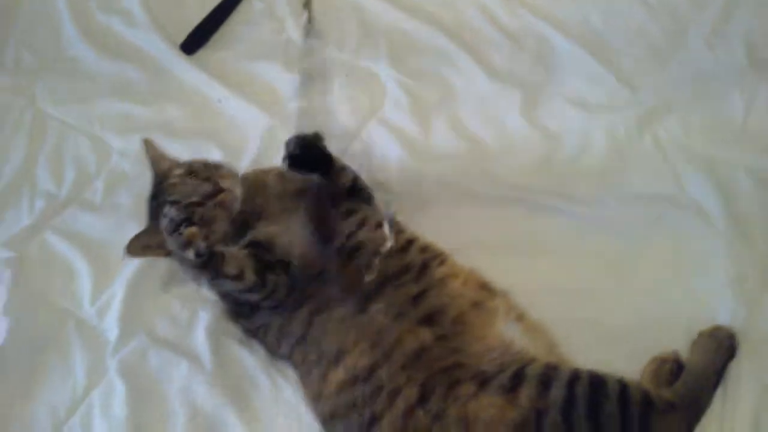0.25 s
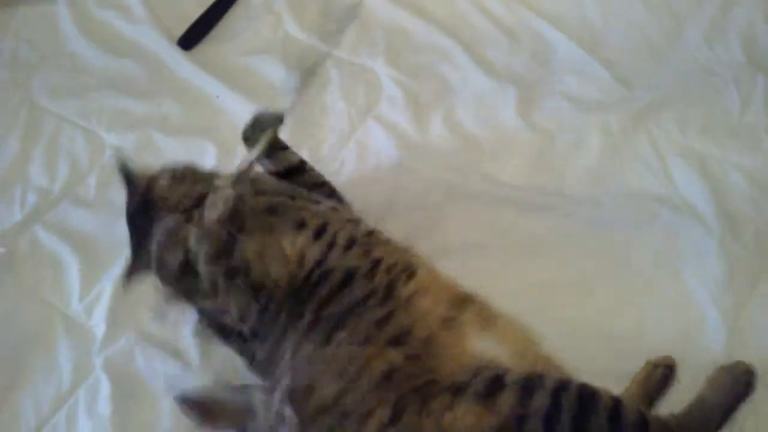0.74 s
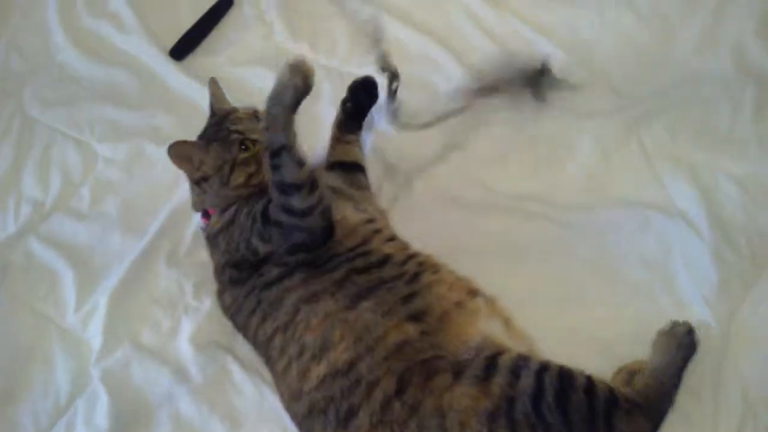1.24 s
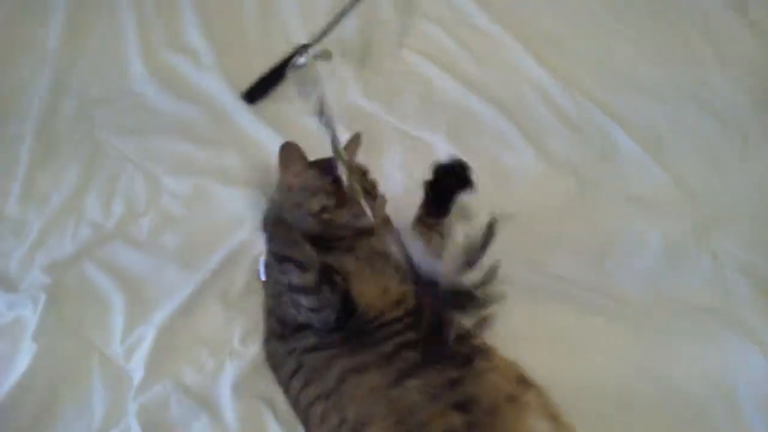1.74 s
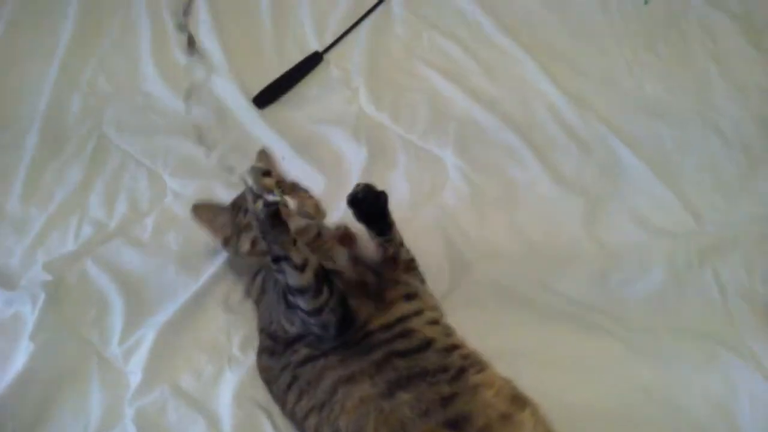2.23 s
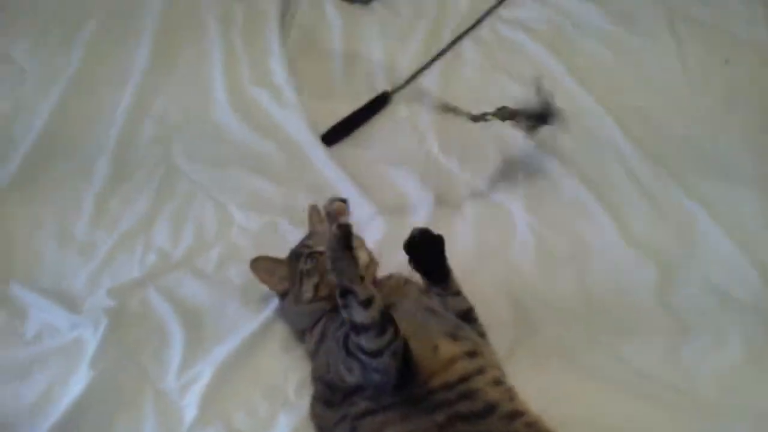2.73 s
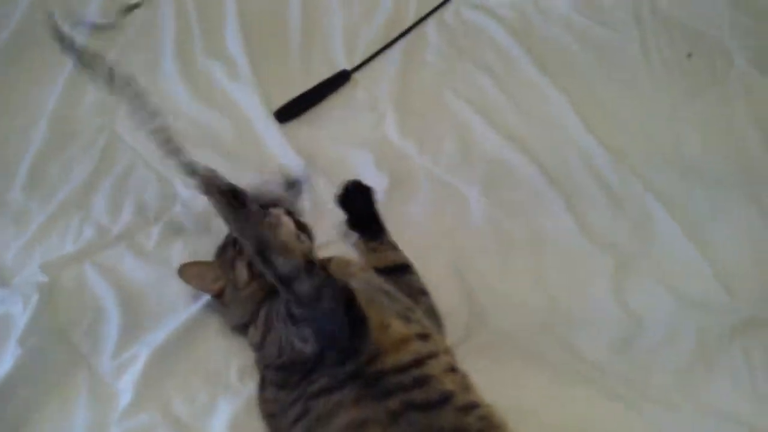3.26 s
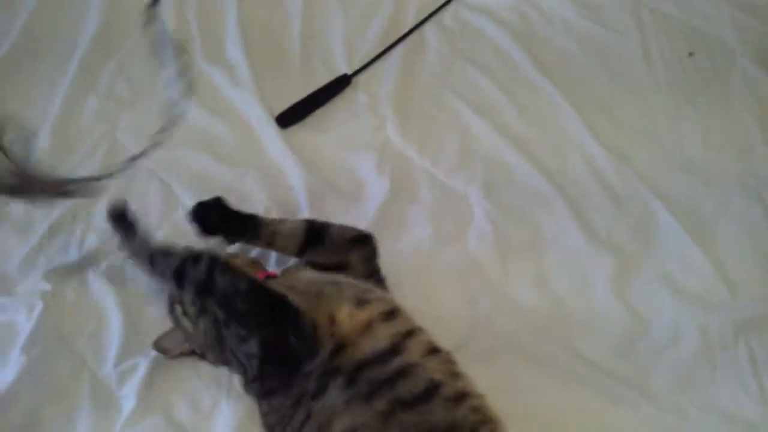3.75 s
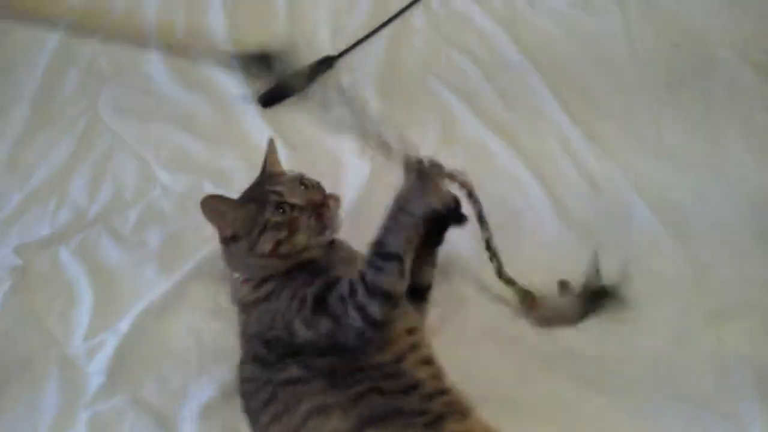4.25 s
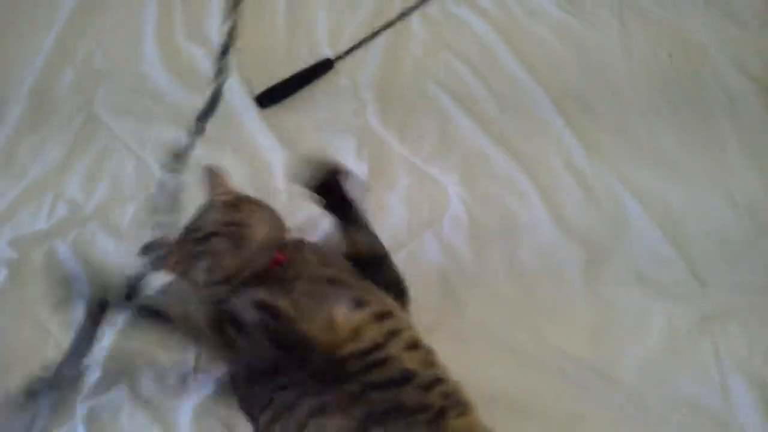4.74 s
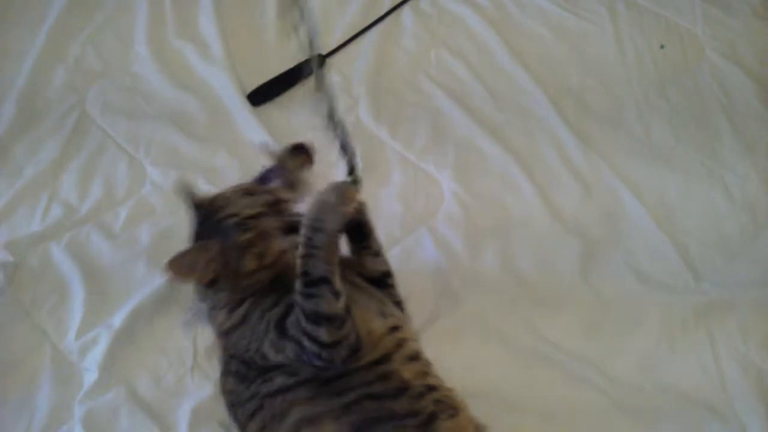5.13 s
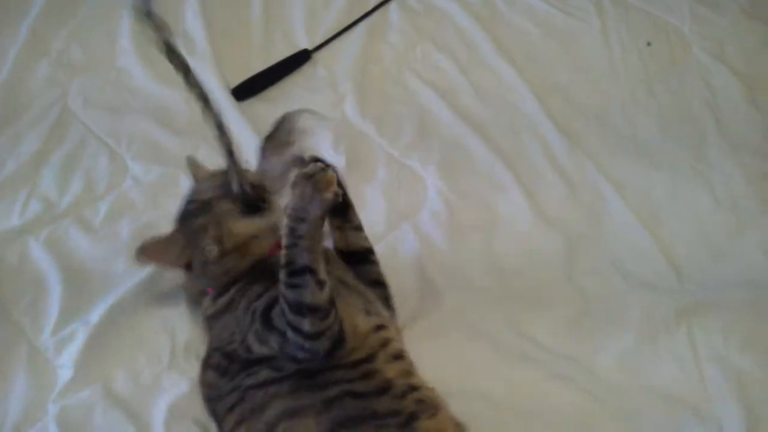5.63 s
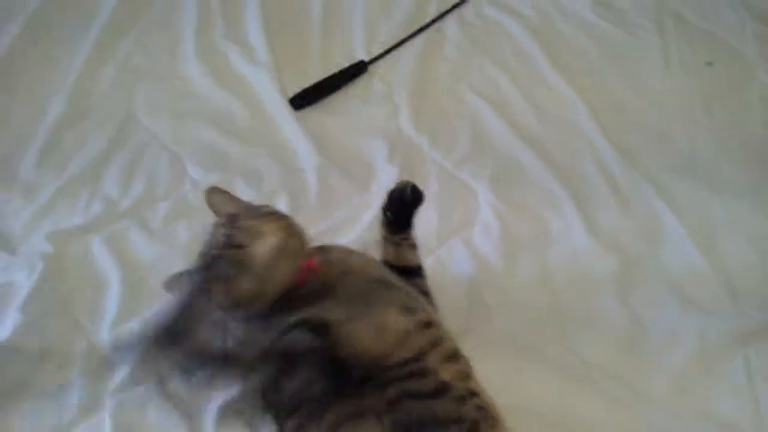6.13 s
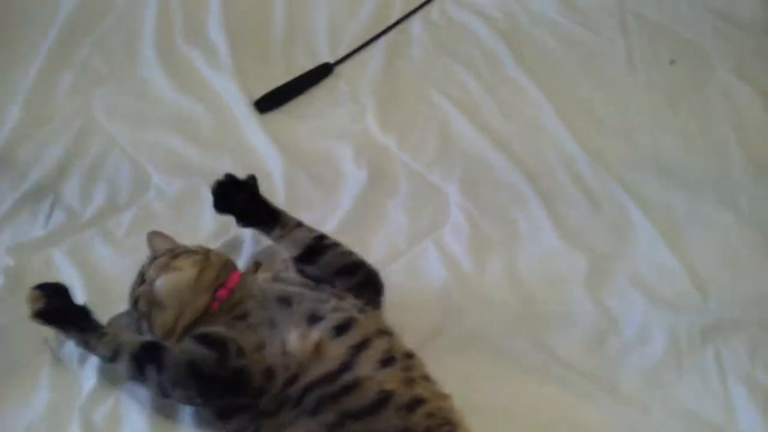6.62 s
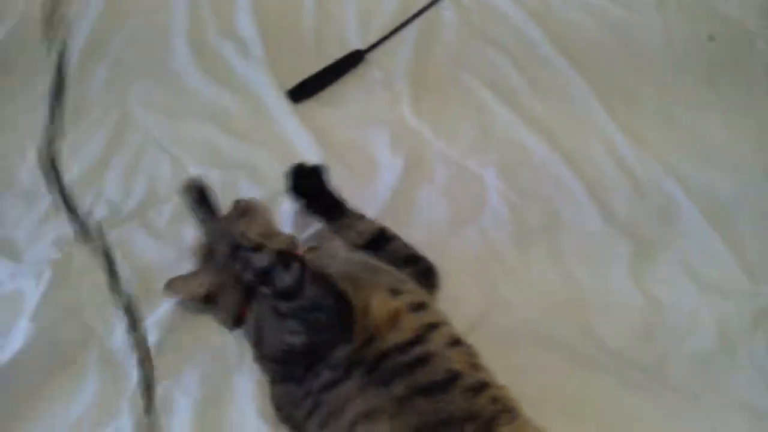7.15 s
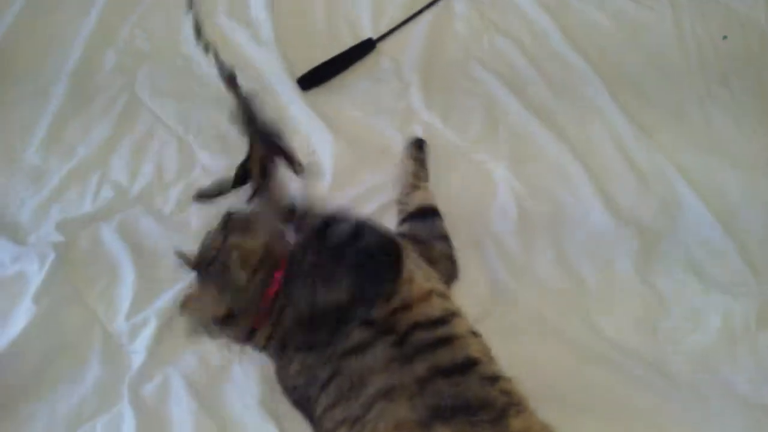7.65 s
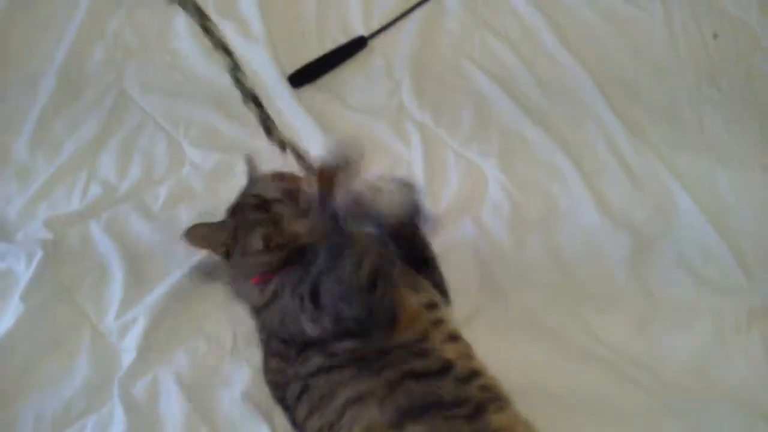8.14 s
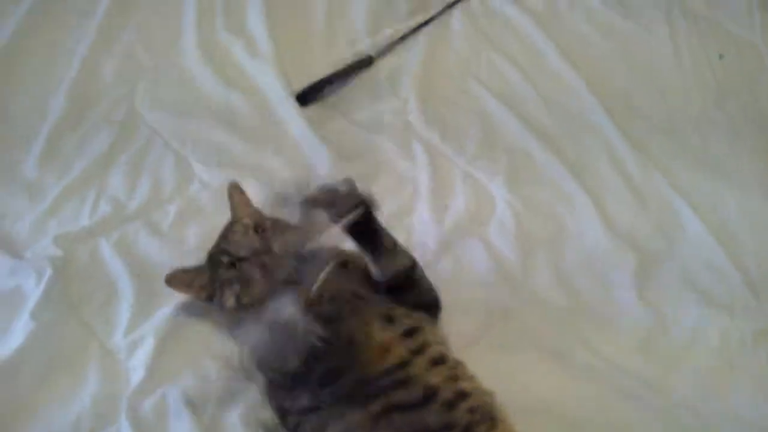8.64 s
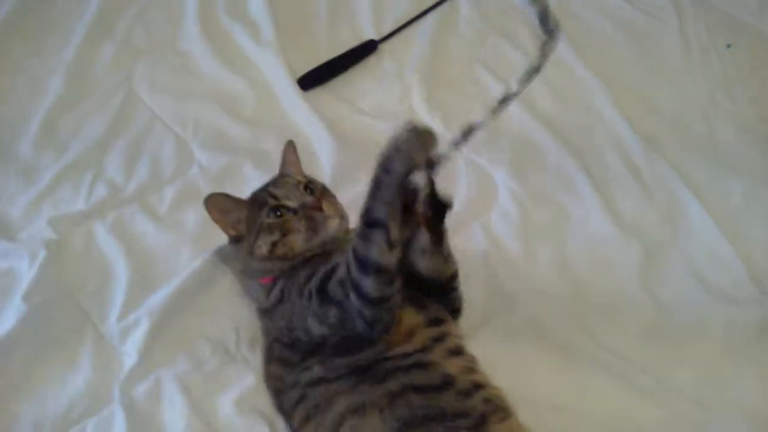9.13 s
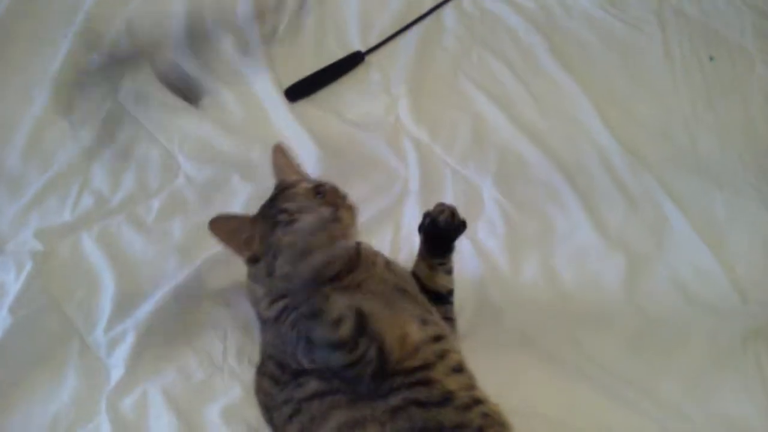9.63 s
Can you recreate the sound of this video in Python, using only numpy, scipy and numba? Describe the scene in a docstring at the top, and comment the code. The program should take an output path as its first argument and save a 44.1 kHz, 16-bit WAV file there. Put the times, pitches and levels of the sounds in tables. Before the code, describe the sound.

A small bell on a cat's collar jingles close to the microphone from the start, as the cat rolls on a bed and swats at a feather toy. The sound is high, thin and metallic: several irregular strikes a second, each followed by a short rattle. Light clicks from the toy mix in throughout. The jingling dips briefly near 3 and 4.3 seconds, nearly stops from 5.8 to 6.2, returns more softly, and pauses again around 7. From about 7.2 seconds it is busy again until the end, near 10. Faint, dull paw pats land on the sheet now and then, clearest around 0.7, 6.3, 7.4 and 8.6 seconds. Underneath, the bedding shifts very quietly, and a barely audible low hum swells between about 6.5 and 8. The room is quiet with little echo; a slight hiss rises with each jingle and drops away between them.

```python
"""A small slotted bell on a cat's collar jingles as the cat rolls on a bed and swats at a feather toy.
The pellet inside strikes the shell and rattles on; the toy taps paws and sheet; bedding shifts in a quiet room.
The camera's noise gate opens on each jingle and lets the room hiss through with it."""
import sys
import numpy as np
from scipy import signal
from scipy.fft import rfft, irfft, next_fast_len
from scipy.io import wavfile
from scipy.ndimage import uniform_filter1d, minimum_filter1d
from numba import njit

SR = 44100
rng = np.random.default_rng(int(sys.argv[2]) if len(sys.argv) > 2 else 0)


def dump_mix(stems):
    """Bounce the given channels to the path in sys.argv[1] as a 16-bit WAV at rate SR."""
    frames = np.atleast_2d(stems).T  # one column per channel
    limited = np.clip(frames, -1, 1)  # hard clip at full scale
    pcm = np.round(limited * 32767).astype(np.int16)
    wavfile.write(sys.argv[1], SR, pcm)


N = 435708

# pellet blows: (s, level dB, t60 of the chatter that follows s, thin wall mode dB and top modes dB relative to
# the blow)
TINKS = [(0.001, -40.5, 0.026, -12, -19)] + [(0.0413, -29.5, 0.085, -8.5, -31), (0.0643, -39, 0.046, -14, -29),
                         (0.0992, -30, 0.11, -14, -28), (0.2019, -53, 0.14, -14, -27),
                         (0.2259, -32.5, 0.064, -21, -26), (0.2882, -71, 0.047, -2, -12),
                         (0.3247, -35, 0.1, -6, -29), (0.3451, -42, 0.1, -20, -29),
                         (0.378, -33.5, 0.056, -27, -30), (0.4329, -26, 0.034, -37, -39),
                         (0.4509, -35, 0.067, -27, -36), (0.4713, -36, 0.2, -19, -31),
                         (0.5187, -23.5, 0.046, -22, -26.5), (0.5641, -43, 0.085, -24, -30),
                         (0.5965, -29.5, 0.19, -27, -28), (0.6265, -44, 0.14, -22, -33),
                         (0.7208, -42, 0.098, -17, -30), (0.7412, -36.5, 0.094, -11, -35),
                         (0.8185, -31.5, 0.15, -25, -30), (0.855, -36, 0.18, -17, -34),
                         (0.9083, -35, 0.1, -19, -28), (0.9143, -30.5, 0.1, -21, -29),
                         (0.9258, -36, 0.077, -26, -35), (1.0206, -34.5, 0.17, -19, -33),
                         (1.0794, -51, 0.055, -12, -16), (1.0979, -47, 0.085, -12, -41),
                         (1.1159, -27, 0.035, -11, -35), (1.1867, -48.5, 0.15, 1, -18),
                         (1.2266, -29, 0.12, -17, -31), (1.2795, -33, 0.12, -21, -24),
                         (1.3054, -41.5, 0.067, -22, -40), (1.3583, -43.5, 0.18, -16, -25),
                         (1.3803, -52, 0.094, -20, -21), (1.4521, -34.5, 0.26, -12.5, -31),
                         (1.4731, -41.5, 0.06, -18, -26), (1.5439, -55, 0.032, -9, -20),
                         (1.5783, -28, 0.085, -21, -38), (1.6107, -31.5, 0.11, -26, -28),
                         (1.6277, -49, 0.053, -23, -34), (1.6462, -30, 0.13, -14, -33),
                         (1.6806, -37, 0.06, -23, -36), (1.711, -38, 0.094, -21, -35),
                         (1.735, -27.5, 0.12, -9, -26), (1.7873, -37, 0.059, -23, -24),
                         (1.8098, -48, 0.05, -23, -16), (1.8447, -34, 0.26, -15.5, -30),
                         (1.9315, -40.5, 0.049, -16, -33), (1.948, -28, 0.038, -15, -22),
                         (1.9809, -34.5, 0.15, -13, -20), (2.0228, -31.5, 0.11, -17, -29),
                         (2.0642, -38, 0.085, -15, -37), (2.1206, -54, 0.085, -1, -28),
                         (2.1505, -29.5, 0.13, -17, -26), (2.2518, -37.5, 0.085, -10, -26),
                         (2.2643, -33.5, 0.09, -20, -20), (2.2852, -34.5, 0.078, -16, -29),
                         (2.3176, -34.5, 0.075, -6, -28), (2.3461, -24.5, 0.11, -15, -25.5),
                         (2.379, -30.5, 0.045, -26, -35), (2.4593, -30, 0.18, -18, -30),
                         (2.4917, -34.5, 0.1, -15, -36), (2.5721, -35, 0.11, -10, -33),
                         (2.599, -27.5, 0.1, -20, -33), (2.6609, -33.5, 0.26, -11, -23),
                         (2.6843, -39, 0.11, -24, -27), (2.7571, -27.5, 0.11, -17, -28),
                         (2.802, -39, 0.069, -14, -28), (2.8305, -40.5, 0.21, -13, -16),
                         (2.8769, -35, 0.11, -14, -29), (2.9078, -43, 0.049, -29, -34),
                         (3.033, -59, 0.075, -17, -42), (3.053, -54.5, 0.19, -0.5, -20),
                         (3.0939, -37, 0.14, -14.5, -26), (3.1827, -35.5, 0.18, -17, -38),
                         (3.2745, -33, 0.22, -14, -30), (3.3238, -45.5, 0.16, -9, -30),
                         (3.3677, -28.5, 0.11, -14, -26), (3.4251, -28, 0.046, -9, -22),
                         (3.488, -29.5, 0.061, -25, -28), (3.5468, -46, 0.098, -7, -28),
                         (3.5633, -35.5, 0.085, -26, -32), (3.5803, -26.5, 0.042, -15, -32),
                         (3.6277, -34.5, 0.082, -11.5, -20), (3.6975, -32, 0.23, -19, -32),
                         (3.7145, -53, 0.075, -21, -38), (3.7853, -36.5, 0.14, -15, -27),
                         (3.8427, -37.5, 0.096, -10, -21), (3.9085, -27.5, 0.074, -18, -39),
                         (3.931, -39, 0.062, -10, -29), (3.9619, -26, 0.11, -14.5, -29),
                         (4.0442, -34.5, 0.11, -13, -30), (4.1235, -33, 0.093, -15, -29),
                         (4.1415, -35.5, 0.06, -24, -36), (4.2233, -47, 0.096, -25, -21),
                         (4.2497, -66, 0.085, -22, -21), (4.2991, -54.5, 0.17, -5, -27),
                         (4.3311, -38, 0.044, -24, -35), (4.3455, -39, 0.063, -24, -36),
                         (4.3974, -51, 0.085, -12, -15), (4.4303, -46.5, 0.03, -21, -20),
                         (4.4583, -27, 0.054, -15, -30), (4.5211, -38, 0.085, -9, -23),
                         (4.5386, -33, 0.063, -18, -36), (4.6244, -45.5, 0.085, -18, -40),
                         (4.6758, -32, 0.085, -11, -35), (4.6803, -39, 0.07, -15, -35),
                         (4.6942, -35.5, 0.072, -15, -23), (4.7326, -39, 0.065, -30, -28),
                         (4.7536, -23, 0.068, -16, -31), (4.802, -38.5, 0.15, -9, -30),
                         (4.8424, -26.5, 0.042, -13, -33), (4.9067, -41.5, 0.093, -8, -13),
                         (4.9342, -34, 0.15, -19, -33), (4.9596, -41, 0.16, -16, -33),
                         (5.033, -26, 0.067, -14, -22), (5.0624, -37, 0.093, -23, -40),
                         (5.0928, -44.5, 0.093, -5, -24), (5.1103, -38.5, 0.14, -6, -27),
                         (5.2026, -71, 0.085, -2, -14), (5.236, -36.5, 0.077, -9, -38), (5.245, -36, 0.19, -8, -28),
                         (5.2894, -31, 0.078, -26, -25), (5.3502, -31, 0.047, -22, -37),
                         (5.4196, -50.5, 0.052, -15, -40), (5.439, -27, 0.11, -30, -47),
                         (5.5094, -31.5, 0.079, -13, -25), (5.5363, -37, 0.06, -19, -11),
                         (5.5588, -37.5, 0.055, -15, -19), (5.5747, -45, 0.085, -11, -29),
                         (5.6136, -44.5, 0.085, -5.5, -36), (5.6521, -46, 0.059, -22, -34),
                         (5.6745, -35, 0.21, -11, -31), (5.7119, -26, 0.048, -26, -40),
                         (5.7453, -47, 0.053, -22, -40), (5.7952, -41.5, 0.075, -14, -41),
                         (5.9309, -46, 0.095, -23, -39), (6.0272, -53.5, 0.14, -35, -39),
                         (6.0427, -58.5, 0.11, -26, -42), (6.1584, -61, 0.085, -8, -32),
                         (6.1719, -57.5, 0.071, -18, -30), (6.1903, -62, 0.085, 8.5, -23),
                         (6.2253, -35.5, 0.17, -22, -40), (6.2966, -65, 0.068, -13, -32),
                         (6.3225, -42, 0.14, -5.5, -42), (6.3654, -44.5, 0.038, -28, -43),
                         (6.4587, -38.5, 0.093, -12.5, -46), (6.4812, -37, 0.08, -18, -32),
                         (6.4991, -36, 0.12, -12, -37), (6.548, -39, 0.085, -24, -40),
                         (6.5879, -50, 0.13, -29, -39), (6.6737, -33, 0.21, -16, -38),
                         (6.7535, -39, 0.077, -11, -29), (6.8813, -34, 0.11, -11.5, -30),
                         (6.9945, -53, 0.072, -13, -35), (7.0249, -57, 0.18, -13, -35.5),
                         (7.1711, -37, 0.06, -6.5, -42), (7.1836, -40, 0.16, -11, -44),
                         (7.2694, -37, 0.12, -5.5, -31), (7.3387, -34.5, 0.075, -13, -32),
                         (7.3687, -36, 0.04, -23, -29), (7.4066, -28, 0.11, -17, -38),
                         (7.444, -34, 0.1, -23, -41), (7.4614, -37, 0.047, -17, -17),
                         (7.4754, -34.5, 0.042, -21, -22), (7.5423, -27.5, 0.13, -12.5, -26),
                         (7.5712, -42, 0.085, -19, -31), (7.5916, -33, 0.21, -23, -32),
                         (7.6375, -32, 0.11, -12.5, -23.5), (7.7423, -37.5, 0.097, -16, -20),
                         (7.7508, -32.5, 0.068, -17, -32), (7.7657, -35, 0.065, -12, -30),
                         (7.8501, -23.5, 0.073, -14, -32), (7.9423, -30, 0.082, -13, -23.5),
                         (7.9872, -48, 0.072, -9.5, -37), (8.0441, -43, 0.048, -23, -33),
                         (8.0915, -45.5, 0.085, -11, -32), (8.113, -50, 0.085, -22, -34),
                         (8.1539, -47, 0.18, -4, -21), (8.1953, -34.5, 0.056, -9, -28),
                         (8.2077, -36, 0.055, -19, -21), (8.2342, -34.5, 0.064, -25, -25),
                         (8.2462, -25, 0.048, -15, -39), (8.2851, -35, 0.058, -17, -33),
                         (8.317, -39.5, 0.2, -7, -22), (8.3554, -30.5, 0.065, -15, -30),
                         (8.3739, -34.5, 0.074, -23, -31), (8.4417, -38, 0.079, -7, -25),
                         (8.4562, -37, 0.072, -27, -20), (8.4856, -33.5, 0.064, -10.5, -35),
                         (8.525, -44.5, 0.26, 1, -14), (8.5994, -26.5, 0.1, -16, -23),
                         (8.6353, -30.5, 0.26, -26, -30), (8.6682, -40, 0.075, -7, -25),
                         (8.6812, -31, 0.064, -21, -22), (8.8029, -29.5, 0.13, -20, -34),
                         (8.9032, -48, 0.064, -17, -30), (8.9276, -52, 0.1, -13, -15),
                         (8.9476, -50.5, 0.085, -23, -20), (9.0059, -30, 0.22, -16, -28),
                         (9.1326, -28, 0.12, -21, -29), (9.1805, -33.5, 0.064, -9, -34),
                         (9.204, -26.5, 0.073, -23, -27), (9.2349, -41, 0.035, -28, -28),
                         (9.2833, -30, 0.04, -21, -32), (9.3227, -38, 0.14, -9, -26),
                         (9.3437, -33.5, 0.094, -16, -27), (9.3626, -38, 0.1, -21, -30),
                         (9.3906, -32.5, 0.14, -25, -31), (9.4045, -43, 0.043, -24, -30),
                         (9.5143, -35.5, 0.072, -7, -21), (9.5332, -38, 0.028, -8, -17),
                         (9.5682, -23, 0.085, -20, -35), (9.615, -33, 0.056, -34, -24),
                         (9.7048, -28.5, 0.13, -14, -55), (9.8041, -37, 0.14, -17, -27),
                         (9.8286, -38, 0.13, -25, -32)] + [(0.4224, -33.5, 0.051, -34, -32), (2.7631, -31.5, 0.06, -13, -30),
                         (3.3722, -32, 0.06, -19, -30), (5.7214, -31, 0.034, -25, -43),
                         (8.5894, -27.5, 0.044, -12, -38), (9.5801, -25, 0.046, -16, -30)]
# for each mode: (dB, t60 s)
BELL = [(-2, 0.0012), (-6.5, 0.018), (-5, 0.015), (-6, 0.0098), (-9.5, 0.0069), (-5.5, 0.004),
        (-19, 0.0071), (-38.5, 0.0003), (-41.5, 0.00021), (-0.5, 0.03), (1, 0.025), (4.5, 0.0033)]
# toy and ring taps: (s, peak dB, centre Hz, width as a share of the centre)
TAPS = [(0.0463, -50, 4730, 0.47), (0.0613, -46.5, 2580, 0.37), (0.0997, -39.5, 3050, 0.61), (0.3222, -41.5, 3100, 0.66),
        (0.4329, -43, 4330, 0.86), (0.5172, -36.5, 2920, 0.61), (0.596, -40, 4740, 0.36), (0.615, -47.5, 2640, 0.38),
        (0.7188, -34.5, 2390, 1), (0.9088, -42.5, 2910, 0.38), (1.0226, -55, 4340, 0.7), (1.1124, -39, 3120, 0.91),
        (1.2254, -52, 4600, 0.5), (1.2431, -44, 2600, 0.27), (1.4501, -66, 4790, 0.7), (1.5773, -43, 2970, 0.58),
        (1.6462, -40.5, 4200, 1), (1.7409, -36, 3320, 0.99), (1.8452, -43.5, 4770, 0.92), (1.946, -36, 2840, 1),
        (2.0368, -43.5, 2550, 0.54), (2.147, -41, 3140, 0.67), (2.258, -61, 4530, 0.7), (2.2623, -42.5, 2600, 0.44),
        (2.3506, -41.5, 2480, 0.3), (2.4645, -55, 4750, 0.7), (2.4713, -40, 2830, 0.5), (2.5711, -37, 4360, 1),
        (2.6748, -40, 2840, 0.58), (2.7596, -40, 2340, 0.32), (2.8878, -50.5, 2410, 0.28), (2.9936, -48, 2920, 0.7),
        (3.0949, -75, 4120, 0.7), (3.1827, -36, 4300, 0.94), (3.2745, -51, 4450, 0.7), (3.2924, -40.5, 2630, 0.62),
        (3.3707, -41, 2600, 0.67), (3.5738, -41.5, 2500, 0.81), (3.7105, -52.5, 2670, 0.32), (3.7823, -44.5, 3000, 0.82),
        (3.9065, -50, 4730, 0.62), (3.9629, -58, 4600, 0.78), (3.9833, -37, 4570, 0.93), (4.123, -55, 4600, 0.7),
        (4.296, -55, 1940, 0.63), (4.4583, -27.5, 4530, 0.75), (4.6668, -46, 2700, 0.27), (4.7002, -41, 4610, 0.86),
        (4.7536, -42, 4570, 1), (4.8424, -31, 4360, 1), (4.9571, -51, 2820, 0.59), (5.034, -37.5, 2870, 0.7),
        (5.24, -40, 2790, 0.55), (5.3467, -50.5, 2440, 0.36), (5.439, -49, 4490, 0.46), (5.6506, -50.5, 2800, 0.33),
        (5.6735, -41.5, 2560, 0.43), (5.7194, -40, 2230, 0.37), (5.7952, -44.5, 4340, 0.54), (6.2307, -48, 4750, 0.7),
        (6.2836, -46, 2190, 1), (6.2946, -41, 2270, 1), (6.3215, -42.5, 4640, 0.42), (6.4582, -71, 4560, 0.7),
        (6.545, -46.5, 3320, 0.7), (6.6742, -58, 2930, 0.27), (6.7535, -38, 4730, 0.78), (6.8798, -67, 4770, 0.7),
        (7.1736, -75, 4250, 0.7), (7.4076, -63, 4290, 0.7), (7.44, -42.5, 2880, 0.66), (7.4619, -47.5, 2930, 0.33),
        (7.5433, -47, 4570, 0.7), (7.638, -41.5, 3170, 0.43), (7.7438, -51, 4620, 0.86), (7.8466, -33.5, 4440, 1),
        (8.0122, -44.5, 2580, 1), (8.2467, -35, 2860, 0.7), (8.4801, -39, 2280, 0.98), (8.6787, -34.5, 4200, 1),
        (8.8039, -67, 4540, 0.63), (8.9032, -52, 2580, 0.7), (9.0074, -69, 4500, 0.7), (9.1301, -32, 4100, 0.89),
        (9.2838, -31.5, 4550, 0.81), (9.5133, -37.5, 4520, 1), (9.5687, -48, 4100, 0.97), (9.5876, -42, 2620, 0.62),
        (9.6882, -45.5, 2590, 1), (9.7014, -36, 4630, 0.85), (9.813, -53, 4600, 0.64), (9.8281, -45.5, 2460, 0.47)]
# body shifting on the mattress: (s, level dB)
BED = [(0, -81), (.7, -72.5), (2, -77.5), (2.7, -70.5), (3.5, -80), (4, -71), (4.5, -79), (4.9, -70), (5.3, -78), (5.7, -67.5),
       (6.1, -72.5), (6.5, -71.5), (6.9, -76), (7.3, -71.5), (8.1, -71.5), (8.9, -73), (9.3, -70.5), (9.88, -68)]
BED_MODES = [(85, 11, 0.5), (118, 32, 5), (311, 76, -1.5), (700, 264, 0)]  # (Hz, width Hz, dB)
HISS = [(20, -23.5), (45, 6), (70, 4), (240, 0), (540, -4), (1010, -5), (1700, -6), (4800, -7), (9200, -14), (16000, -11.5)]  # (Hz, dB per Hz)
HISS_DB = -69
ROOM_T60_S, ROOM_DB = 0.28, -4.5
TOP_HZ = 15720  # fixed
HUM_HZ, HUM_WIDTH_HZ = 174.3, 12
# soft paw pats on the sheet: (s, peak dB, centre Hz, width as a share of the centre)
PATS = [(0.342, -62.5, 235, 0.66), (0.719, -57.5, 240, 1), (1.137, -68, 196, 0.6), (2.677, -64, 300, 0.56),
        (3.193, -64, 275, 0.6), (3.942, -66, 300, 0.5), (4.859, -65, 223, 0.69), (6.282, -56, 654, 0.82),
        (7.191, -60.5, 238, 0.6), (7.371, -52.5, 340, 0.2), (7.635, -58, 181, 0.43), (8.447, -60.5, 221, 0.82),
        (8.638, -59, 760, 0.41), (9.129, -70, 840, 0.53), (9.683, -62, 315, 0.6)]
GATE_DEPTH_DB = 23  # fixed
GATE_OPEN_DB, GATE_SLOPE, GATE_SENSE_S, GATE_HOLD_S, GATE_RELEASE_S = -40.5, 1, 0.0051, 0.0055, 0.035
# bell modes (Hz)
BELL_HZ = [5250, 5640, 5780, 5960, 6900, 7500, 8300, 9600, 11500, 6520, 13090, 13370]  # fixed
# family of each mode: 0 mouth and body, 1 thin wall, 2 top
BELL_FAMILY = [0, 0, 0, 0, 0, 0, 0, 0, 0, 1, 2, 2]  # fixed
TAP_T60_S = 0.023
PAT_T60_S = 0.055
# a low hum swells for a while: (s, level dB)
HUM = [(0, -89), (6.2, -83.5), (6.5, -70.5), (7.2, -73.5), (7.5, -67.5), (8.1, -75), (8.6, -91.5), (9.88, -93)]
GATE_AHEAD_S = 0.0023
TAP_DIP_HZ, TAP_DIP_WIDTH_HZ, TAP_DIP_SHARE = 3640, 730, 0.38  # the taps have a hollow in their spectrum


def undb(db):
    return 10 ** (np.asarray(db) / 20)


def level(x, db):
    return x * undb(db) / np.sqrt(np.mean(x ** 2))


def clicks(s, size):
    """One-sample pushes at the given times."""
    out = np.zeros(N)
    np.add.at(out, np.clip((s * SR).astype(int), 0, N - 1), size)
    return out


def ring(x, hz, t60):
    """A mode that rings at peak size 1 for a unit push."""
    r, w = np.exp(-np.log(1000) / (t60 * SR)), 2 * np.pi * hz / SR
    return signal.lfilter([np.sin(w)], [1, -2 * r * np.cos(w), r * r], x)


def band(x, hz, width):
    return signal.lfilter(*signal.iirpeak(hz, hz / width, SR), x)


@njit
def follow(x, release):
    """Peak follower: jumps up at once, sinks slowly."""
    y, e = np.empty(len(x)), 1e-9
    for i in range(len(x)):
        e = max(abs(x[i]), e * release)
        y[i] = e
    return y


def bell(blow_db=-7, hold_s=0.0029, chatter_db=-7, chatter_rate=520, scatter_db=2.5, colour_db=-1.0, lead_s=0.0039, scrape_s=0.00053,
         roll_t60=0.065, roll_db=-6, roll_s=0.021, low_hz=5250):
    """The pellet stirs just before each blow and chatters after it until it settles; every contact lands on another spot."""
    s, db, settle, wall_db, top_db = np.transpose(TINKS)
    family_db = np.array([0 * s, wall_db, top_db]) + db
    ahead = SR // 50
    t = np.arange(-ahead, SR // 5) / SR
    unrest = np.zeros((3, N + len(t)))
    for i, size, t60 in zip((s * SR).astype(int), undb(family_db.T), settle):
        unrest[:, i:i + len(t)] += size[:, None] * np.where(t < 0, 0.63 * np.exp(t / lead_s), undb(-60 * np.maximum(t - hold_s, 0) / t60))
    contact = (rng.random(N) < chatter_rate / SR) * undb(chatter_db + scatter_db * np.minimum(rng.exponential(size=N), 3.2))
    spot = rng.standard_normal((len(s), len(BELL)))
    scrape = np.exp(-np.arange(SR // 300) / (scrape_s * SR))
    scrape /= np.sqrt(np.sum(scrape ** 2))
    # the pellet rolls along the thin wall a little longer than it chatters and keeps that mode singing
    keep = np.exp(-1 / (roll_s * SR))
    rolling = signal.lfilter([1 - keep], [1, -keep], unrest[1, ahead:N + ahead])
    out = level(ring(rng.standard_normal(N), BELL_HZ[-3], roll_t60), roll_db) * rolling
    for k, (hz, (mode_db, t60), family) in enumerate(zip(BELL_HZ, BELL, BELL_FAMILY)):
        push = clicks(s, undb(family_db[family] + blow_db + colour_db * spot[:, k]))
        # a blow is a scrape of about a millisecond, not one clean tick
        push = signal.lfilter(scrape, 1, push) * np.sign(rng.standard_normal(N))
        push += contact * unrest[family, ahead:N + ahead] * rng.standard_normal(N)
        # the wall takes a few cycles to pass the ring to the air
        out = out + undb(mode_db) * band(ring(push, hz, t60), hz, 0.44 * hz)
    # so small a shell radiates no bass
    return signal.sosfilt(signal.butter(6, low_hz, "high", fs=SR, output="sos"), out)


def bed(rustle_db=3.0):
    """Low, uneven noise in the resonances of mattress and room, and a narrow hum."""
    rustle = 0
    for hz, width, db in BED_MODES:
        swell = level(uniform_filter1d(uniform_filter1d(rng.standard_normal(N), size=4000), size=4000), 0)
        rustle = rustle + undb(rustle_db * swell) * level(band(band(rng.standard_normal(N), hz, 2 * width), hz, width), db)
    hum = band(rng.standard_normal(N), HUM_HZ, HUM_WIDTH_HZ)
    return level(rustle, 0) * undb(curve(BED)) + level(hum, 0) * undb(curve(HUM))


def hiss():
    """Steady room and microphone noise."""
    hz, db = np.transpose(HISS)
    size = next_fast_len(N)
    f = np.maximum(np.arange(size // 2 + 1) * SR / size, 1)
    return level(irfft(rfft(rng.standard_normal(size)) * undb(np.interp(np.log(f), np.log(hz), db)), size)[:N], HISS_DB)


def room(x, count=5, step=.07):
    """A soft bedroom: a fading spray of echoes; the bell keeps moving, so the spray changes from moment to moment."""
    t = np.arange(SR // 3) / SR
    shape = undb(-60 * t / ROOM_T60_S) * np.clip(t / 0.0014 - .5, 0, 1)
    place = np.arange(N) // int(step * SR) % count
    wet = sum(signal.oaconvolve(x * (place == k), shape * rng.standard_normal(len(t)))[:N] for k in range(count))
    return wet * undb(ROOM_DB) / np.sqrt(np.sum(shape ** 2))




def knocks(table, t60, tail_db, rise, low_hz):
    """Short dull knocks: each a burst of noise in a resonance of its own."""
    out, t = np.zeros(N), np.arange(SR // 8) / SR
    grain = rng.standard_normal((len(table), len(t)))
    shape = (1 - np.exp(-t / rise)) * (undb(-60 * t / t60) + undb(tail_db - 60 * t / (7.9 * t60)))
    for (s, db, hz, share), noise in zip(table, grain):
        width = np.clip(share, .1, 1.6) * hz
        knock = band(band(noise * shape, hz, width), hz, width)
        i = int(s * SR)
        out[i:i + len(t)] += (knock * undb(db) / np.abs(knock).max())[:N - i]
    return signal.sosfilt(signal.butter(3, low_hz, "high", fs=SR, output="sos"), out)


def curve(table):
    return np.interp(np.arange(N) / SR, *np.transpose(table))


def scene():
    taps = knocks(TAPS, TAP_T60_S, tail_db=-24.5, rise=0.00072, low_hz=1196)
    taps = taps - np.clip(TAP_DIP_SHARE, 0, 1) * band(taps, TAP_DIP_HZ, TAP_DIP_WIDTH_HZ)
    pats = knocks(PATS, PAT_T60_S, tail_db=-31.5, rise=0.0065, low_hz=119)
    near = bell() + taps + pats
    return (near + room(near) + bed() + hiss())[None]


def record(dry):
    """A gate looks a little ahead, opens with the treble level, holds a moment and sinks back; then the top is cut."""
    sensed = signal.sosfilt(signal.butter(2, 1500, "high", fs=SR, output="sos"), dry[0])
    env_db = 20 * np.log10(follow(sensed, np.exp(-1 / (GATE_SENSE_S * SR))))
    wanted = undb(np.clip(GATE_SLOPE * (env_db - GATE_OPEN_DB), -GATE_DEPTH_DB, 0))
    hold = 2 * int(GATE_HOLD_S * SR / 2) + 1
    held = -minimum_filter1d(-wanted, hold, origin=hold // 2)
    gain = follow(held, np.exp(-1 / (GATE_RELEASE_S * SR)))
    early = np.interp(np.arange(N) + GATE_AHEAD_S * SR, np.arange(N), gain)
    gated = dry * uniform_filter1d(early, size=128)
    return signal.sosfilt(signal.ellip(10, .2, 60, TOP_HZ, fs=SR, output="sos"), gated)


dry = scene()
out = record(dry)
dump_mix(out)
```